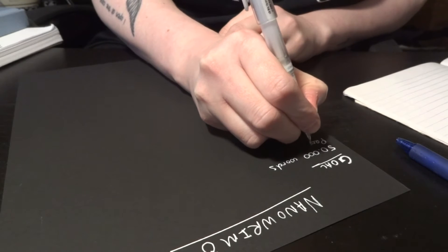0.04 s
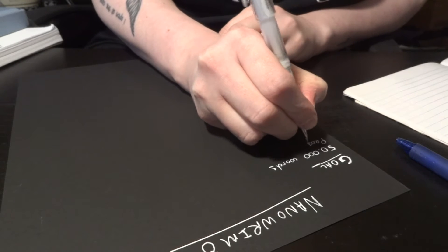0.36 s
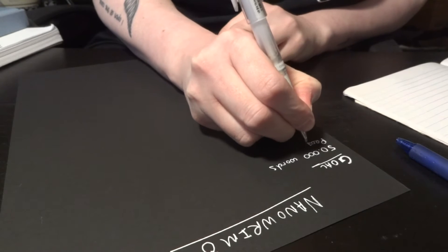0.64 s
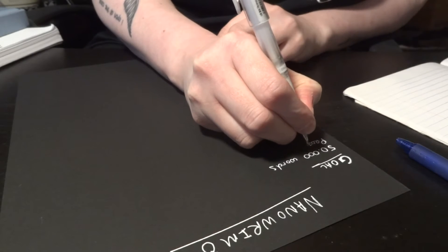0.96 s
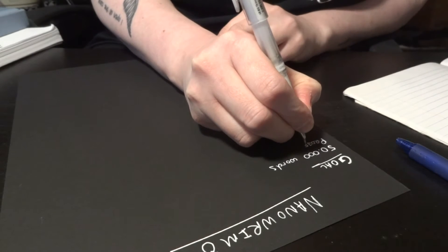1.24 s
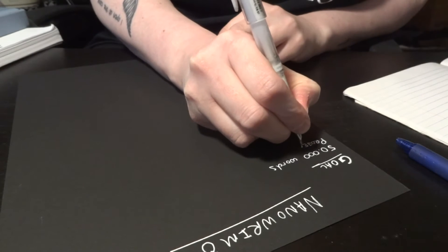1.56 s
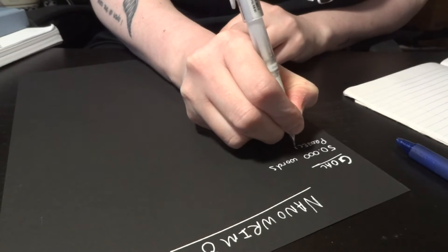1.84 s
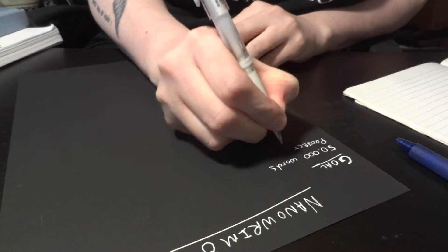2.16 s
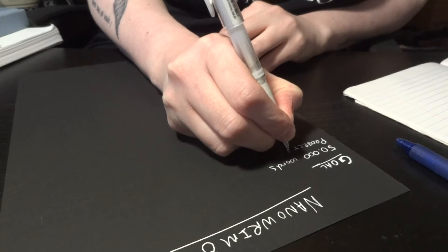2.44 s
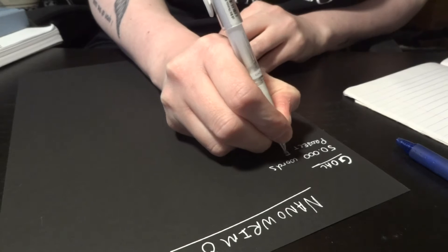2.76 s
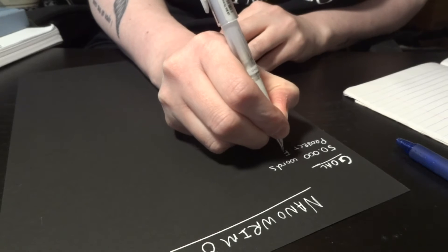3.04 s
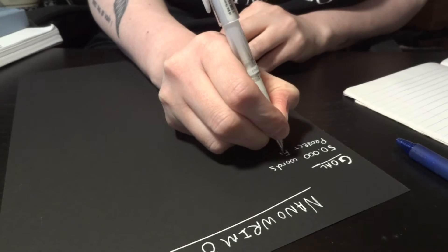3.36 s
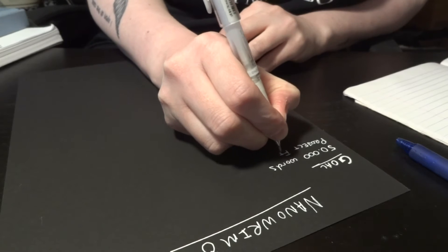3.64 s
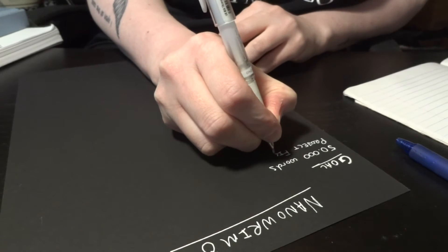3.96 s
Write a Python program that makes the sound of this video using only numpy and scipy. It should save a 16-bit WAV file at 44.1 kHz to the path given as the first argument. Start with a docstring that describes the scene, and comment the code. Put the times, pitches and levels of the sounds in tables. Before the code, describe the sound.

A pen writes on card very close, its tip ticking and knocking softly on the desk between short, dry scratches. A hand brushes the sheet at about 0.6 seconds, and after a brief pause the writing resumes near 0.9. The sharpest tap and a brighter swish come around 2.1 seconds. Uneven taps and strokes continue until 4 seconds, over a low room rumble and faint fan-like whine.

```python
"""At a desk in a quiet room, a gel pen prints small letters on a sheet of card, heard from very close.
Each time the pen tip lands, it ticks, knocks on the desk and sets it rocking. The tip then drags over
the paper grain and sometimes catches with a tiny rasp. Now and then the hand slides along the sheet.
Behind it all are a low rumble and a faint fan-like whine."""
import sys
import numpy as np
from scipy import signal
from scipy.fft import rfft, irfft
from scipy.io import wavfile
from scipy.ndimage import uniform_filter1d

SR = 44100
rng = np.random.default_rng(int(sys.argv[2]) if len(sys.argv) > 2 else 0)


def bounce(signal):
    """Save signal as a 16-bit WAV file at the path given by the first command-line argument."""
    frames = np.transpose(np.atleast_2d(signal))
    limited = np.clip(frames, -1, 1)
    pcm = np.round(limited * 32767).astype(np.int16)
    wavfile.write(sys.argv[1], SR, pcm)


N = 176400
SWAY_HZ = 24.34  # how fast the desk rocks


def undb(db):
    """Turn decibels into a number to multiply by."""
    return 10 ** (np.asarray(db) / 20)


def unit(x):
    """Scale a signal to an average power of 1."""
    return x / np.sqrt(np.mean(x ** 2))


def through(x, response):
    """Play a signal through an object, given that object's response to one click."""
    return signal.fftconvolve(x, response)[:N]


def colour(x, points, size=4096):
    """Shape the tone along (frequency [Hz], level [dB]) points; only the level differences count."""
    hz, db = np.array(points).T
    log_hz = np.log(np.fft.rfftfreq(size, 1 / SR) + 1)
    gains = undb(np.interp(log_hz, np.log(hz), db))
    # fold the filter so that it rings only after a sound, never before
    cepstrum = irfft(np.log(gains))
    cepstrum[1:size // 2] *= 2
    cepstrum[size // 2 + 1:] = 0
    response = irfft(np.exp(rfft(cepstrum)))
    return through(x, response / np.linalg.norm(response))


def ring(hz, fade_s):
    """One tone ringing after a blow; it drops by 60 dB in fade_s."""
    t = np.arange(SR) / SR
    return np.cos(2 * np.pi * hz * t) * np.exp(-np.log(1000) * t / fade_s)


def wander(per_s):
    """A smooth random drift of typical size 1, with per_s turns a second."""
    step = int(SR / per_s)
    stairs = np.repeat(rng.standard_normal(N // step + 1), step)
    return unit(uniform_filter1d(stairs, step)[:N])


def swell(t, start, peak, end, curve):
    """The strength of one movement: it rises from rest and falls back."""
    return np.sin(np.pi / 2 * np.interp(t, [start, peak, end], [0, 1, 0])) ** curve


def push(t, length):
    """The force of one contact, adding up to 1: a longer contact is softer."""
    progress = np.clip(t / length, 0, 20)
    force = progress ** 2 * np.exp(-2 * np.pi * progress)
    return force / force.sum()


def bursts(t, rows, rise_s=0.0011):
    """Short surges of force: a quick bite, then a rounded release."""
    force = 0
    for start, length, db in rows:
        bite = np.clip((t - start) / rise_s, 0, 1)
        release = np.exp(-np.minimum(((t - start) / (0.83 * length)) ** 2, 20))
        force += undb(db) * bite * release
    return force


def paper_grain(spread_db, hiss, clicks_per_s=1400):
    """Paper fibres slip under the tip: random clicks of uneven size over a fine hiss."""
    size = undb(spread_db * np.minimum(rng.exponential(size=N), 4))
    clicks = (rng.random(N) < clicks_per_s / SR) * size * rng.choice([-1, 1], N)
    return unit(unit(clicks) + hiss * rng.standard_normal(N))


def room(whine_hz=1352, waver_hz=3.9):
    """Low rumble and faint hiss with a thin, slightly wavering whine."""
    # tone of the room's noise (frequency [Hz], level [dB])
    room_tone = [(20, 26.5), (40, 19), (80, -2), (200, -3), (400, -5), (500, -3.5), (650, -13),
                 (950, -16.5), (1200, -10.5), (1350, -7.5), (1600, -13), (2300, -24.5), (5000, -28),
                 (10000, -32.5), (16000, -31.5)]
    pitch = whine_hz + waver_hz * wander(25)
    whine = np.sin(2 * np.pi * np.cumsum(pitch) / SR) * undb(2 * wander(13))
    return undb(-49.5) * colour(rng.standard_normal(N), room_tone) + undb(-70) * unit(whine)


def room_echo(t, sound, fade_s=0.21):
    """The room sends back a short, faint echo that starts 5 ms late."""
    tail = rng.standard_normal(N) * np.exp(-np.log(1000) * t / fade_s) * (t > .005)
    return undb(-18.5) * through(sound, tail / np.linalg.norm(tail))


def desk_wobble(t):
    """The moving arm keeps the desk swaying unevenly."""
    # strength of the swaying (time [s], level [dB])
    sway_levels = [(0, -37), (.3, -51.5), (.55, -48.5), (.8, -61.5), (.96, -37), (1.4, -40), (1.55, -38.5),
                   (2.2, -36.5), (2.35, -46.5), (2.6, -52), (2.95, -35.5), (3.24, -49), (3.4, -39),
                   (3.7, -34.5), (4, -44)]
    rocking = np.sin(2 * np.pi * np.cumsum(SWAY_HZ * (1 + 0.14 * wander(30))) / SR)
    level = undb(np.interp(t, *np.array(sway_levels).T))
    return level * unit(rocking * undb(3.1 * wander(25)))


def desk_ring():
    """After a blow, the desk top rings with many tones at once."""
    # the desk's own tones (frequency [Hz], level [dB], time to fade by 60 dB [s])
    desk_tones = [(62.4, -14.5, 0.19), (116.5, -27.5, 0.24), (171.6, -29.5, 0.45), (346, 0, 0.032),
                  (343.6, -9.5, 0.097), (439, -14, 0.18), (481, -10, 0.066), (538, -7, 0.0075),
                  (564, -12.5, 0.068), (855, -15, 0.096), (961.5, -16, 0.091), (1163, -11.5, 0.15),
                  (1273, -12.5, 0.12), (1820, -18, 0.017)]
    return sum(undb(db) * ring(hz, fade_s) for hz, db, fade_s in desk_tones)


def hand_slides(t):
    """The side of the hand brushes over the sheet, brighter when it moves fast."""
    # hand movements (start [s], rise [s], hold [s], fall [s], level [dB], treble level [dB])
    slides = [(-.08, 0.017, 0.017, 0.17, -56.5, -81), (0.582, 0.035, 0.044, 0.081, -55, -59.5),
              (2.096, 0.077, 0.056, 0.095, -53, -46.5), (2.26, .04, 0.071, 0.11, -68, -74)]
    # dull part of skin rubbing on card (frequency [Hz], level [dB])
    skin_tone = [(100, -62), (350, -0.5), (850, -8), (1200, -1), (1600, -3.5), (2000, -2.5), (2700, -14.5),
                 (3500, -12), (6000, -24), (16000, -33)]
    # bright part of that rubbing (frequency [Hz], level [dB])
    treble_tone = [(1000, -25), (2100, 3.5), (2800, -3), (3500, 0), (4400, 2), (5800, 5), (6700, -1.5),
                   (8000, 3), (9800, -6.5), (13000, -3.5), (16000, -3.5)]
    low = high = 0
    for start, rise, hold, fall, db, treble_db in slides:
        ramp = np.interp(t, np.cumsum([start, rise, hold, fall]), [0, 1, 1, 0])
        speed = np.sin(np.pi / 2 * ramp) ** 1.53
        low += undb(db) * speed
        high += undb(treble_db) * speed ** 2
    drag = undb(.5 * wander(51))
    dull = colour(drag * low * rng.standard_normal(N), skin_tone)
    bright = colour(drag * high * rng.standard_normal(N), treble_tone)
    return dull + bright


def pen_catches(t):
    """The tip sticks and slips in short bursts, which make it ring with a tiny rasp."""
    # moments when the tip catches (start [s], length [s], level [dB])
    catches = [(0.148, 0.022, -62), (0.345, 0.055, -64), (0.412, 0.015, -57), (1.014, 0.021, -59.5),
               (1.056, 0.028, -62.5), (1.136, 0.013, -59), (1.301, 0.0063, -57), (1.454, 0.008, -61),
               (1.714, 0.012, -55), (1.957, 0.022, -67), (2.132, 0.015, -51), (2.857, 0.019, -53),
               (3.008, 0.0046, -60.5), (3.061, 0.01, -51.5), (3.382, 0.015, -61), (3.594, 0.013, -53),
               (3.786, 0.027, -55)]
    # tone of the rasping tip (frequency [Hz], level [dB])
    rasp_tone = [(1000, -21), (2100, -3), (2750, -22), (3250, 10), (3800, -1.5), (4400, 1.5), (5500, -6.5),
                 (7500, -17), (10000, -26), (16000, -52)]
    return colour(bursts(t, catches) * paper_grain(spread_db=1, hiss=0.41), rasp_tone)


def pen_strokes(t, hiss_lag_s=0.0065):
    """The tip drags: a grainy rub through the desk, a hiss and an airy treble from the paper."""
    # pen movements (start [s], fastest [s], end [s], rub [dB], hiss [dB], airy treble [dB])
    strokes = [(0.036, .07, 0.14, -55, -96, -94), (0.095, 0.137, 0.2, -50, -69, -65.5),
               (0.214, 0.252, 0.35, -50, -69.5, -71.5), (.32, 0.364, 0.48, -52.5, -64.5, -93),
               (0.403, 0.427, 0.67, -61, -62, -66), (.89, 0.943, 0.99, -53, -72, -80),
               (0.98, 1.036, 1.186, -46.5, -59.5, -96), (1.064, 1.136, 1.37, -59.5, -64, -74),
               (1.214, 1.28, 1.41, -53.5, -67, -77), (1.368, 1.445, 1.548, -51.5, -61, -69),
               (1.577, 1.624, 1.7, -54.5, -74, -74), (1.646, 1.725, 1.798, -48, -58.5, -65.5),
               (1.858, 1.939, 1.925, -48, -63.5, -74), (2.093, 2.128, 2.165, -40.5, -50.5, -72),
               (2.532, 2.599, 2.676, -46.5, -62.5, -69), (2.684, 2.687, 2.75, -53.5, -68.5, -92),
               (2.794, 2.836, 2.9, -47.5, -62.5, -66), (2.963, 3.088, 3.09, -50, -61.5, -69),
               (3.325, 3.337, 3.43, -54, -65, -73), (3.487, 3.562, 3.67, -50, -63.5, -68.5),
               (3.696, 3.778, 3.89, -52.5, -62, -70), (3.882, 3.951, 4, -53.5, -74, -76)]
    # the tip judders and shakes the desk (start [s], length [s], level [dB])
    judders = [(.09, .012, -60), (0.182, 0.018, -51.5), (0.213, 0.012, -46), (0.334, 0.035, -43.5),
               (0.394, 0.083, -49.5), (0.941, 0.015, -46), (1.002, 0.023, -49.5), (1.116, 0.0077, -40),
               (1.444, 0.013, -44.5), (1.867, 0.036, -50), (1.933, 0.022, -44.5), (2.0936, 0.011, -37),
               (2.135, .014, -38.5), (2.697, 0.011, -48.5), (3.062, 0.0075, -43), (3.314, 0.0093, -43),
               (3.778, 0.026, -42.5)]
    # tone of the low rub (frequency [Hz], level [dB])
    rub_tone = [(60, 8.5), (150, -7.5), (240, -18), (345, -1.5), (520, -1), (720, -10.5), (950, -8),
                (1080, -18), (1180, -11), (1380, -3.5), (1650, -19.5), (2000, -15), (2700, -29),
                (8000, -94)]
    # tone of the paper's hiss (frequency [Hz], level [dB])
    hiss_tone = [(600, -29), (2100, 7.5), (2700, -7.5), (3300, 4.5), (3800, -2.5), (4400, 1.5), (5600, -15),
                 (6600, -21.5), (8000, -20.5), (16000, -38)]
    # tone of the airy treble (frequency [Hz], level [dB])
    air_tone = [(2000, -25), (5000, 1), (6600, -2.5), (8200, 2), (9700, -11.5), (13000, -8), (16000, -6.5)]
    rub = hiss = air = 0
    for start, peak, end, rub_db, hiss_db, air_db in strokes:
        rub += undb(rub_db) * swell(t, start, peak, end, curve=1.34)
        speed = swell(t - hiss_lag_s, start, peak, end, curve=2.68)
        hiss += undb(hiss_db) * speed
        air += undb(air_db) * speed
    pressure = undb(2 * wander(70))
    slips = np.hypot(rub * pressure, bursts(t, judders)) * paper_grain(spread_db=1.5, hiss=0.59)
    desk = desk_ring()
    return (undb(-1) * colour(slips, rub_tone)
            + undb(-14.5) * through(slips, desk / np.linalg.norm(desk))
            + undb(-3.5) * colour(hiss * pressure * paper_grain(spread_db=5, hiss=1.45), hiss_tone)
            + undb(-5) * colour(air * pressure * rng.standard_normal(N), air_tone))


def pen_taps(t, tick_decay_s=0.0029, click_decay_s=0.00063, edge_lag_s=0.002083):
    """The tip lands: the pen ticks, its metal ball clicks, and the desk knocks and rocks."""
    # landings of the tip (time [s], knock [dB], tick [dB], contact time [s])
    taps = [(0.0478, -33.5, -49.5, 0.0016), (0.135, -57.5, -67, 0.00023), (.879, -42, -56, 0.0009),
            (0.909, -44.5, -57, 0.00071), (1.006, -43.5, -59, 0.00051), (1.2494, -33, -51, 0.0014),
            (1.374, -47.5, -60.5, 0.0011), (1.587, -40, -54.5, 0.0011), (1.869, -39.5, -41, 0.00035),
            (2.068, -30, -37.5, 0.001), (2.5549, -35, -45, 0.0011), (2.690, -45, -53, 0.00058),
            (2.7746, -34.5, -52, 0.001), (2.9875, -35, -54, 0.0021), (3.270, -40.5, -54.5, 0.00091),
            (3.5125, -36.5, -41.5, 0.0007), (3.718, -35, -46, 0.00099), (3.9083, -36.5, -44.5, 0.0014)]
    # tone of the pen's tick (frequency [Hz], level [dB])
    tick_tone = [(300, -29), (900, 12.5), (1400, -34), (2100, -0.5), (2700, -19), (3300, -3.5),
                 (4400, -6.5), (6000, -19), (8000, -22.5), (10000, -39), (16000, -49)]
    blows, tick_level, click_level = np.zeros((3, N))
    brief = t[:SR // 20]
    for start, knock_db, tick_db, contact_s in taps:
        span = slice(int(start * SR), int(start * SR) + len(brief))
        blows[span] += undb(knock_db) * push(brief, contact_s)
        tick_level[span] += undb(tick_db) * np.exp(-brief / tick_decay_s)
        click_level[span] += undb(tick_db - 13.5) * np.exp(-brief / click_decay_s)
    soft_blows = through(blows, push(brief, length=0.0049))
    sway = -through(soft_blows, ring(SWAY_HZ, fade_s=0.34))
    returned = .35 * np.interp(t - edge_lag_s, t, blows)  # each blow bounces back from the desk's edge
    knock = through(blows + returned, desk_ring())
    tick = colour(tick_level * rng.standard_normal(N), tick_tone)
    click = click_level * rng.standard_normal(N)
    return undb(3) * knock + undb(4) * sway + undb(-0.5) * tick + click


def scene():
    """Pen, hand and desk close by, with the room's echo and noise behind them."""
    t = np.arange(N) / SR
    near = pen_taps(t) + pen_strokes(t) + desk_wobble(t) + pen_catches(t) + hand_slides(t)
    return (near + room_echo(t, near) + room())[None]


def record(dry, top_hz=15650):
    """Cut away the very highest treble."""
    return signal.sosfilt(signal.ellip(10, .2, 70, top_hz, fs=SR, output="sos"), dry)


dry = scene()
out = record(dry)
bounce(out)
```